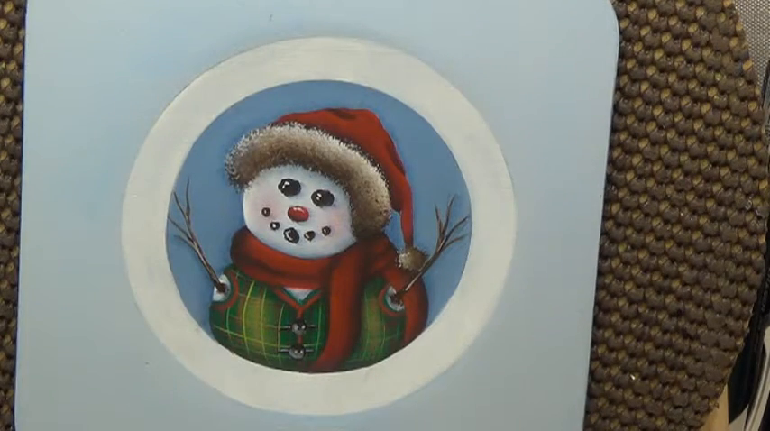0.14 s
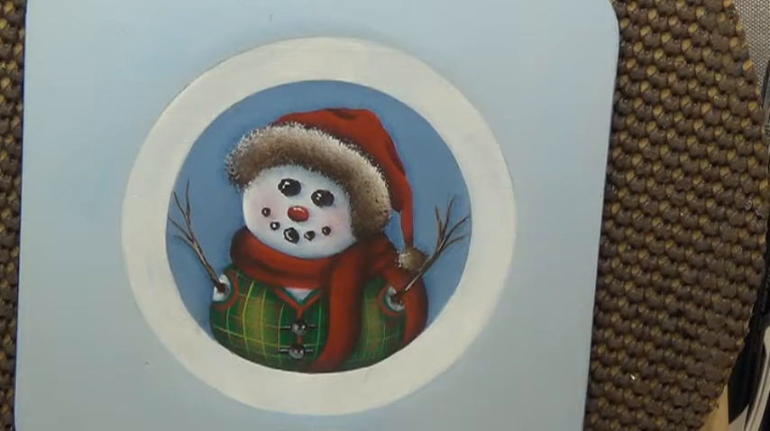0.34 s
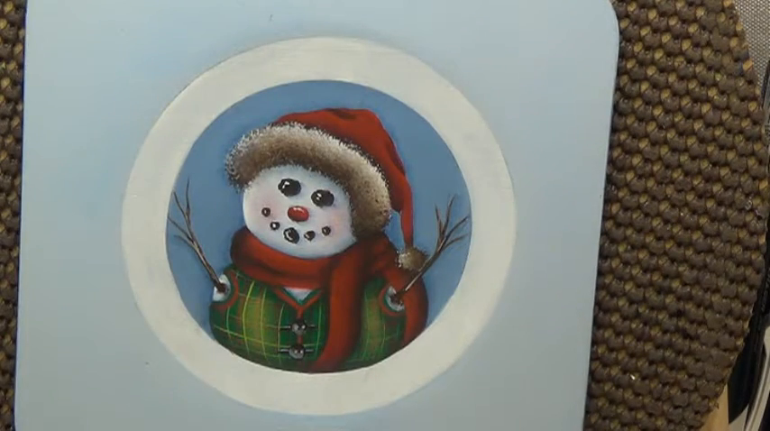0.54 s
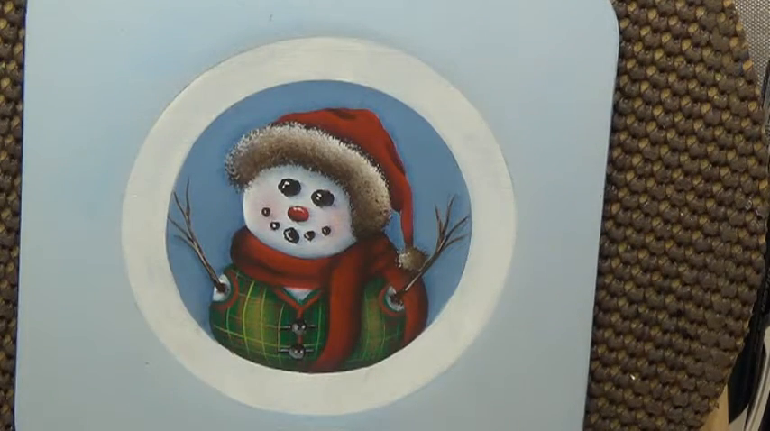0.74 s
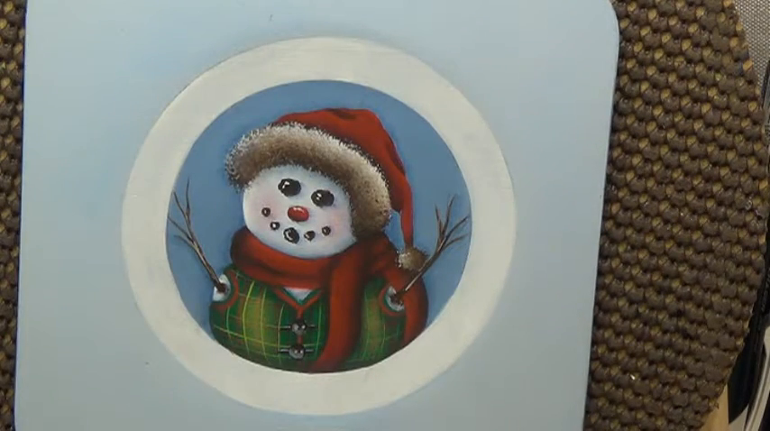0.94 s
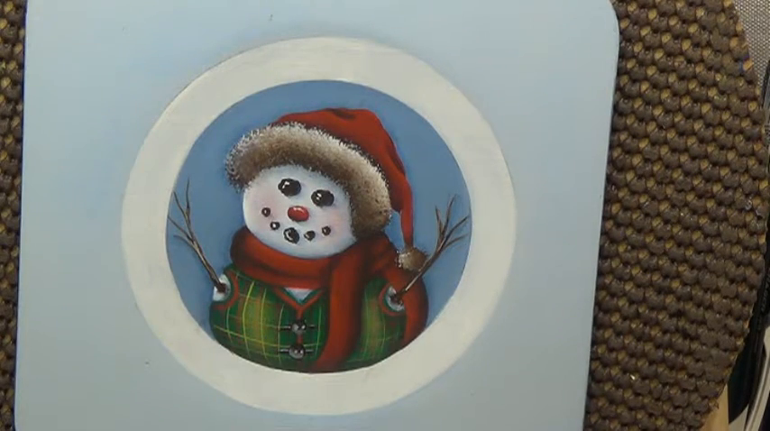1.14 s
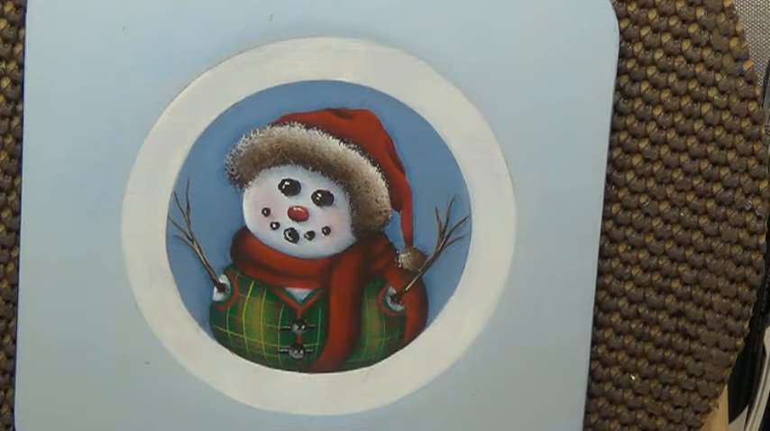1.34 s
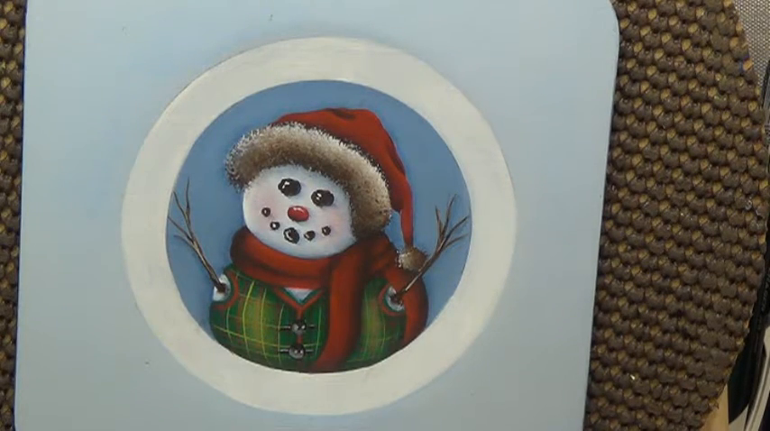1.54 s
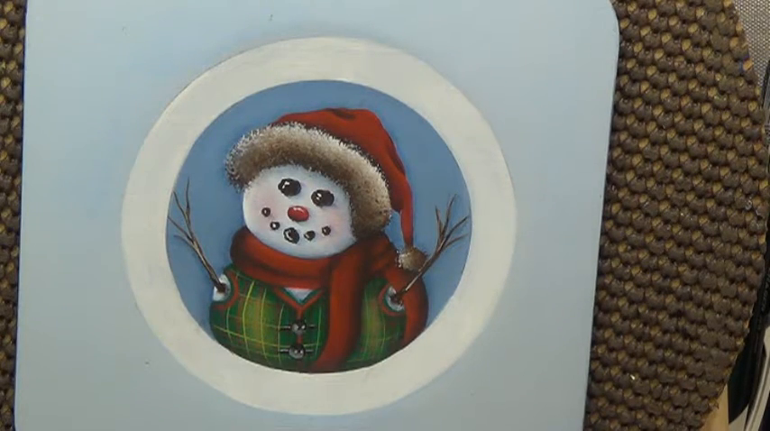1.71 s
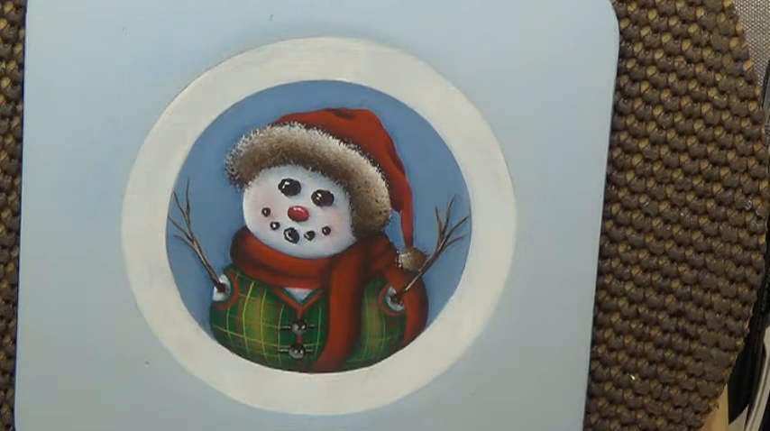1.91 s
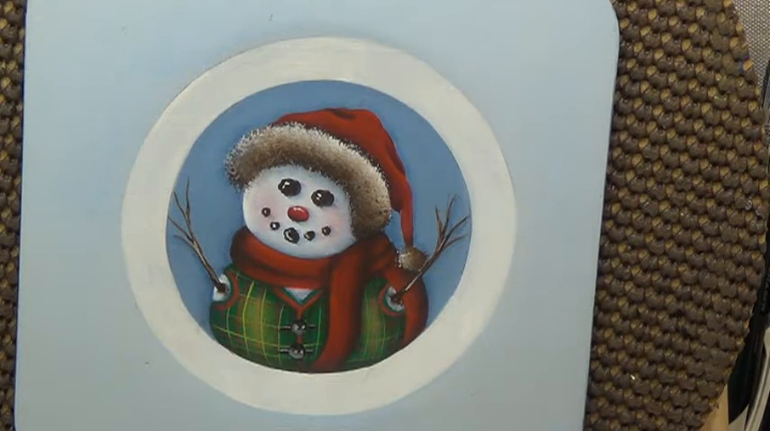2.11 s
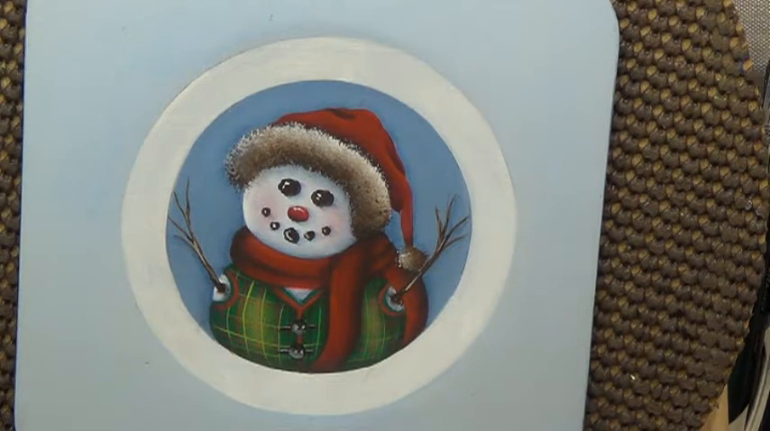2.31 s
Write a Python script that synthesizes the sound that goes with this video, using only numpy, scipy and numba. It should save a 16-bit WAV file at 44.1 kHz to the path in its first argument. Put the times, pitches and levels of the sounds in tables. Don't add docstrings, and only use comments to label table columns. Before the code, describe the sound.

A paintbrush rinsed in a plastic water tub, knocking and splashing, then three taps on a table

```python
import sys
import numpy as np
from scipy import signal
from scipy.fft import rfft, irfft
from scipy.io import wavfile
from scipy.ndimage import uniform_filter1d
from numba import njit

SR = 44100
rng = np.random.default_rng(int(sys.argv[2]) if len(sys.argv) > 2 else 0)


def master(y):
    cut = np.clip(np.atleast_2d(y).T, -1, 1)
    pcm = np.round(cut * 32767)
    wavfile.write(sys.argv[1], SR, pcm.astype(np.int16))


def natural_amplitude(level_db):
    exponent = np.asarray(level_db, float) / 20
    return 10 ** exponent


N = 108750

# (time [s], peak level [dB])
TAPS = [
    (2.1084, -14),
    (2.276, -15),
    (2.4542, -15),
]
# (frequency [Hz], level [dB], ring time t60 [s])
TABLE = [(108.4, -27.5, 0.13), (191, -10, 0.047), (346, -2.5, .08), (485, -2, .045), (590, -6, .055),
         (739, -9.5, 0.097), (854, -13, 0.019), (1000, -5.5, 0.016), (1570, -15.5, 0.0077)]


def unit(x):
    return x / np.sqrt(np.mean(x ** 2))


def band(x, hz, width_hz):
    return signal.lfilter(*signal.iirpeak(hz, hz / width_hz, fs=SR), x)


def band_twice(x, hz, width_hz):
    return band(band(x, hz, width_hz), hz, width_hz)


def shade(table, hz):
    table_hz, table_db = np.array(table).T
    return np.interp(np.log(hz), np.log(table_hz), table_db)


def swell(start, length, rise=0.36):
    u = (np.arange(N) / SR - start) / length
    ramp = np.minimum(u / rise, (1 - u) / (1 - rise))
    return np.sin(np.pi / 2 * np.clip(ramp, 0, 1)) ** 2


@njit
def rings(at, size, hz, t60, attack, glide, turn):
    out = np.zeros(N)
    for k in range(len(at)):
        first, phase = int(at[k] * SR) + 1, turn[k]
        for i in range(max(first, 0), min(first + int(t60[k] * SR), N)):
            u = i / SR - at[k]
            phase += 2 * np.pi * hz[k] * (1 + glide[k] * u) / SR
            fade = (1 - np.exp(-u / attack[k])) * np.exp(-np.log(1000) * u / t60[k])
            out[i] += size[k] * fade * np.sin(phase)
    return out


def ring(at, db, hz, t60, attack, glide=0., turn=0.):
    settings = np.broadcast_arrays(at, db, hz, t60, attack, glide, turn)
    at, db, hz, t60, attack, glide, turn = (1. * v.ravel() for v in settings)
    return rings(at, natural_amplitude(db), hz, np.clip(t60, .002, 1), np.clip(attack, 1e-5, 1), glide, turn)


def pan(x, db):
    return x * natural_amplitude(np.array([[db / 2], [-db / 2]]))


def camcorder():
    # (frequency [Hz], density [dB per Hz])
    hiss_curve = [(24, -14), (50, -17), (108, -22), (300, -12), (1000, -14.5), (3190, -20), (11400, -22),
                  (15300, -37)]
    # (frequency [Hz], level [dB], ring time t60 [s])
    tick_modes = [(3090, -8.5, 0.051), (2630, -7.5, 0.037)]
    field_hz, line_hz, second_line_hz = 59.94, 15734.3, 15747.2
    f, t = np.maximum(np.arange(N // 2 + 1) * SR / N, 1), np.arange(N) / SR

    def shaped_noise(weight):
        return irfft(rfft(rng.standard_normal(N)) * natural_amplitude(shade(hiss_curve, f)) * weight, N)

    mid = shaped_noise(1)
    side = shaped_noise(0.071 + 60 / (f + 40) + 0.32 * (f > 6000))
    hiss = natural_amplitude(-54.5) * unit(mid + side * np.array([[1], [-1]]))
    hum = natural_amplitude(-60.5) * unit(band_twice(rng.standard_normal(N), 117.5, 31))

    k = np.arange(-1, 74)[:, None]
    hz, mode_db, t60 = np.array(tick_modes).T
    tick_db = -43.5 - 5 * (k % 2) + 2 * rng.standard_normal((len(k), 2))
    ticks = ring(.0409 + 2 * k / field_hz, tick_db + mode_db, hz, t60, 0.00083)

    field_pulse = np.diff(np.floor(t * field_hz), prepend=0)
    gate = field_pulse * np.cos(2 * np.pi * line_hz * t + 1)
    buzz = natural_amplitude(-67) * unit(band_twice(gate, 14700, 290))
    second = natural_amplitude(-4.7) * np.sin(2 * np.pi * second_line_hz * t)
    whine = np.sqrt(2) * natural_amplitude(-58) * (np.sin(2 * np.pi * line_hz * t) + second)
    return hiss + pan(hum, -9.0) + ticks + buzz + whine


def strokes():
    # (time [s], level [dB], thump frequency [Hz])
    stroke_events = [(-.02, -26.5, 134.5), (0.067, -44.5, 116), (0.16, -31.5, 125), (0.254, -29, 154),
                     (0.341, -31, 135), (0.417, -26.5, 163), (0.497, -30, 130), (0.572, -25, 142),
                     (0.66, -25.5, 129.4), (0.772, -36.5, 152), (0.829, -28.5, 142), (0.9, -27.5, 150)]
    # (time [s], peak level [dB])
    shove_events = [(0.009, -24.5), (0.097, -32.5), (0.171, -21), (0.249, -25), (0.348, -26.5),
                    (0.423, -30), (0.509, -26.5), (0.551, -34), (0.589, -27.5), (0.676, -29),
                    (0.747, -28.5), (0.843, -28.5), (0.905, -28), (0.967, -37), (1.286, -40), (1.357, -37),
                    (1.498, -40.5), (1.635, -46), (1.69, -43), (1.728, -44), (1.87, -40.5)]
    thump_cycles, rumble_s, rumble_db = 6.9, 0.099, -7
    tap_shake_db, thump_rough = -17.5, .55
    t, thump = np.arange(N) / SR, 0
    for s, db, hz in stroke_events:
        rocking = np.sin(2 * np.pi * hz * (t - s))
        thump = thump + natural_amplitude(db) * swell(s, thump_cycles / hz, rise=.4) * rocking
    tap_shakes = [(s + 0.014, db + tap_shake_db) for s, db in TAPS]
    push = sum(natural_amplitude(db + rumble_db) * swell(s - .004, rumble_s, rise=0.049)
               for s, db in list(shove_events) + tap_shakes)
    noise = rng.standard_normal(N)
    body = unit(sum(natural_amplitude(db) * unit(band(noise, hz, 6 / t60)) for hz, db, t60 in TABLE[1:]))
    roughness = 1 + thump_rough * unit(band(noise, 50, 80))
    return band_twice(thump * roughness, 145, 200), band(push * body, 294, 480)


def splashes(count=4000):
    # (time [s], level [dB], length [s], brightness [dB per octave])
    splash_events = [(-0, -33, 0.12, 7), (0.07, -29, 0.076, 3.5), (0.154, -48, 0.042, 5),
                     (0.193, -29.5, 0.038, 4.5), (0.222, -33.5, 0.11, 5), (0.353, -51.5, 0.052, 15.5),
                     (0.399, -35, 0.068, 6), (.45, -37.5, 0.037, 4), (0.521, -31.5, 0.067, 5.5),
                     (0.571, -37, 0.11, 6), (0.665, -38, 0.14, 3.5), (0.737, -37, 0.066, 6),
                     (0.792, -37.5, 0.13, -1), (0.844, -30, 0.068, 2.5), (0.883, -34.5, 0.18, 5),
                     (0.944, -40, 0.081, 3.5), (1.287, -45, 0.067, 6), (1.387, -38.5, 0.022, -2),
                     (1.406, -39.5, 0.02, 10.5), (1.459, -36, 0.047, -8.5), (1.516, -40, 0.052, 3),
                     (1.552, -36, 0.046, 4.5), (1.599, -36.5, 0.071, 6), (1.663, -31, 0.071, 3.5),
                     (1.713, -33.5, 0.1, 2.5), (1.779, -42, 0.032, -0.5)]
    # (frequency [Hz], density [dB per Hz])
    splash_curve = [(240, -45), (400, -57), (854, -2), (2490, -16), (3510, -15), (4070, -15.5),
                    (14000, -37)]
    spray_db = -6
    place, pitch, strength, length_draw, glide_draw = rng.random((count, 5)).T
    at, hz = place * 1.85, 750 * 16 ** pitch ** 1.293
    grain_db = shade(splash_curve, hz) + 3 * np.log2(hz / 1000) - 3.0 * np.log(strength + .05)
    out = 0
    for low_hz in 700 * 2. ** np.arange(5):
        pick = (hz >= low_hz) & (hz < 2 * low_hz)
        cycles = 24 * (.3 + length_draw[pick])
        grains = ring(at[pick], grain_db[pick], hz[pick], cycles / hz[pick], 2 / hz[pick],
                      12 * glide_draw[pick])
        mid_hz = 1.4 * low_hz
        flicker_db = 4 * unit(uniform_filter1d(rng.standard_normal(N), size=200))
        spray = band_twice(rng.standard_normal(N), mid_hz, low_hz)
        spray = spray * natural_amplitude(shade(splash_curve, mid_hz) + spray_db + flicker_db)
        envelope = sum(natural_amplitude(db + tilt_db * np.log2(low_hz / 1400)) * swell(s, length, rise=0.18)
                       for s, db, length, tilt_db in splash_events)
        out = out + (grains + spray) * envelope
    return out * natural_amplitude(10.5)


def bubbles():
    # (time [s], peak level [dB], frequency [Hz], fade [cycles])
    large_bubbles = [(.023, -28, 1143, 32), (.09, -22.5, 810, 25), (.171, -30, 918, 50),
                     (.189, -19.5, 777, 18), (.2094, -20.5, 2050, 30), (.212, -17, 1064, 31),
                     (.238, -25.5, 1480, 41), (.377, -17.5, 855, 12.5), (.408, -28.5, 1980, 30),
                     (.415, -21.5, 908, 26), (.458, -28.5, 1960, 48), (.474, -31, 1506, 45),
                     (.49, -30.5, 1250, 44), (.523, -33, 802, 25), (.605, -18, 1170, 41),
                     (.746, -22, 1540, 22), (.765, -18.5, 1003, 11.5), (.81, -25, 1170, 16),
                     (.859, -21.5, 1000, 25), (.876, -29, 1060, 22), (.927, -20.5, 1186, 30),
                     (.96, -10.5, 947, 16), (.985, -30, 920, 20), (1.286, -14.5, 2680, 39),
                     (1.29, -24, 780, 52), (1.31, -24, 2180, 35), (1.318, -22, 1105, 45),
                     (1.321, -26, 2780, 40), (1.353, -10, 1827, 24.7), (1.362, -30, 2160, 28),
                     (1.389, -25.5, 2330, 49), (1.388, -23.5, 1310, 30), (1.399, -21, 1390, 29),
                     (1.424, -29, 937, 58), (1.465, -19, 1360, 47), (1.468, -35, 1130, 8.7),
                     (1.477, -22.5, 1350, 29), (1.502, -11.5, 1161, 44), (1.559, -18, 1774, 29),
                     (1.565, -23, 1490, 25), (1.616, -21.5, 1546, 29), (1.618, -21.5, 2150, 36),
                     (1.639, -25, 950, 50), (1.669, -23, 1220, 25), (1.676, -18, 1850, 34),
                     (1.7, -28, 966, 51)]
    # (time [s], peak level [dB], frequency [Hz])
    small_bubbles = [(.0144, -23, 7400), (.0892, -19, 3430), (.1945, -28, 3840), (.2092, -15.5, 7440),
                     (.2433, -35, 3340), (.3481, -37, 3900), (.4105, -22, 7840), (.4246, -20, 4970),
                     (.4579, -24, 3780), (.4885, -21.5, 4940), (.5082, -30, 3220), (.5312, -13, 6850),
                     (.5315, -18.5, 3685), (.5816, -27.5, 3340), (.7073, -25.5, 3800), (.7467, -16, 8020),
                     (.858, -26, 3750), (.8925, -20, 5080), (.902, -23, 4600), (1.3535, -23.5, 3150),
                     (1.4117, -17, 4750), (1.421, -24.5, 3630), (1.629, -30, 5100), (1.682, -26, 5100),
                     (1.697, -21.5, 3100), (1.765, -28, 1740), (1.7787, -26, 2120), (1.7795, -26, 3580),
                     (2.0106, -38.5, 4900), (2.3156, -34, 7270)]
    shed_db, small_cycles, rough = -9, 55, .45
    s, db, hz, cycles = np.array(large_bubbles).T
    pitch, delay = rng.random((2, 2, len(s)))
    shed_hz = hz * (0.782 + 0.685 * pitch)
    shed = ring(s + .003 + .014 * delay, db + shed_db, shed_hz, 24 / shed_hz, .001, 6)
    large = ring(s, db + 3, hz, cycles / hz, 0.00085, 0.53)
    flutter = 1 + rough * unit(band(rng.standard_normal(N), 150, 300))
    s, db, hz = np.array(small_bubbles).T
    small = ring(s, db + 1, hz, small_cycles / hz, .0005, 2.8)
    return flutter * (large + shed) + small


def knocks():
    # (time [s], peak level [dB], brightness [dB per octave])
    knock_events = [
        (0.035, -8, 4.5),
        (0.243, -17.5, 3),
        (0.37, -15, 7.5),
        (0.532, -19, -1.5),
        (0.96, -12, 5),
        (1.281, -5, 1),
        (1.501, -10, -0.5),
        (1.724, -4.5, 1),
    ]
    # (frequency [Hz], level [dB])
    wall_modes = [(960, -6.5), (1200, -4.5), (1510, -3), (2080, -4), (2680, -16.5), (3150, -5),
                  (3700, -2.5), (4400, -2.5), (5670, -9.5), (6600, -13.5)]
    # (frequency [Hz], level [dB], ring time t60 [s])
    rim_modes = [(1050, -17, .035), (1500, -8, .014), (2550, -11, .014), (2760, -13, .022),
                 (3970, -13, 0.007), (5000, -20, .01), (6510, -18, .008)]
    wall_t60_s, contact_s, scatter_db = 0.024, .0004, 2
    rattle_s, rattle_db = .003, -5
    crack_s, crack_db, rim_s = 0.0081, -19, 1.8708
    s, db, tilt_db = np.array(knock_events).T[:, :, None]
    hz, mode_db = np.array(wall_modes).T
    level = db - 6.5 + mode_db + tilt_db * np.log2(hz / 2000)
    t60 = wall_t60_s * np.sqrt(1000 / hz)
    wall = 0
    for late, change_db in ((0, 0), (rattle_s, rattle_db)):
        strength, detune, turn = rng.standard_normal((3, len(s), len(hz)))
        wall = wall + ring(s + late, level + change_db + scatter_db * strength,
                           hz * (1 + 0.062 * detune), t60, contact_s, 0, 2 * turn)
    burst = sum(natural_amplitude(a + b) * swell(start, crack_s) for start, a, b in knock_events)
    burst = burst + natural_amplitude(-1.5) * swell(rim_s, crack_s)
    crack = natural_amplitude(crack_db) * burst * band_twice(rng.standard_normal(N), 2900, 8800)
    hz, mode_db, t60 = np.array(rim_modes).T
    rim = ring(rim_s, mode_db - 6, hz, t60, 0.0006) + ring(rim_s + 0.0007, mode_db, hz, t60, 0.00025)
    return wall + crack + rim


def taps():
    contact_s, bounce_s, bounce_db, tick_db = .0016, .0059, 3, -41
    s, db = np.array(TAPS).T[:, :, None]
    hz, mode_db, t60 = np.array(TABLE).T
    sign = np.pi * (np.arange(len(TABLE)) % 2)
    level, octaves = db - 5 + mode_db, np.log2(hz / 350)
    blow = ring(s, level + 3 * octaves, hz, t60, contact_s, 0, sign)
    bounce = ring(s + bounce_s, level + bounce_db - 8 * octaves, hz, t60, contact_s, 0, sign)
    touch = sum(swell(start - .004, 0.01) for start in s[:, 0])
    tick = touch * band(rng.standard_normal(N), 4100, 6200) * natural_amplitude(tick_db)
    return blow + bounce + tick


def room(x):
    t60_s, level_db, side_db, low_hz, top_hz = 0.17, -13.5, -35, 650, 5250
    u = np.arange(1 << 14) / SR
    fade = np.exp(-np.log(1000) * u / t60_s) * np.clip(u / 0.00047, 0, 1)
    tail = rfft(rng.standard_normal((2, len(u))) * fade)
    tail = irfft(tail / np.sqrt(uniform_filter1d(abs(tail) ** 2, size=25)), len(u))
    tail = tail * (u < 1.5 * t60_s) * (u > 0)
    tail = signal.lfilter(*signal.butter(1, top_hz, fs=SR), tail)
    tail = signal.lfilter(*signal.butter(2, low_hz, "high", fs=SR), tail)
    tail = tail / np.sqrt(np.sum(tail[0] ** 2)) * natural_amplitude(level_db)
    both = tail[0] + natural_amplitude(side_db) * tail[1] * np.array([[1], [-1]])
    return x + signal.fftconvolve(x, both, axes=1)[:, :N]


def scene():
    noises = camcorder()
    thump, rumble = strokes()
    water = splashes() + bubbles() + knocks()
    water = signal.lfilter(*signal.butter(1, 450, "high", fs=SR), water)
    dull = signal.lfilter(*signal.butter(1, 1800, fs=SR), water)
    tub = pan(dull, -4.5) + pan(water - dull, -2.5) + pan(thump, -8)
    table = pan(taps(), -1.9) + pan(rumble, -4)
    return room(tub + table) + noises


def low_pass(x):
    return signal.sosfilt(signal.butter(12, 17040, fs=SR, output="sos"), x)


def record(dry):
    x = signal.sosfilt(signal.butter(1, 40, "high", fs=SR, output="sos"), dry)
    x = signal.sosfilt(signal.cheby1(10, .3, 15790, fs=SR, output="sos"), x)
    return low_pass(x)


dry = scene()
out = record(dry)
master(out)
```